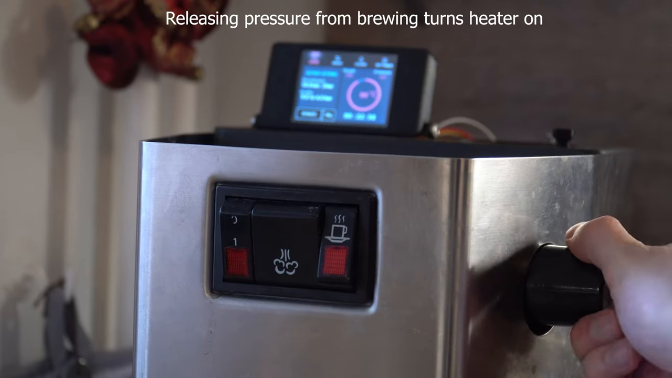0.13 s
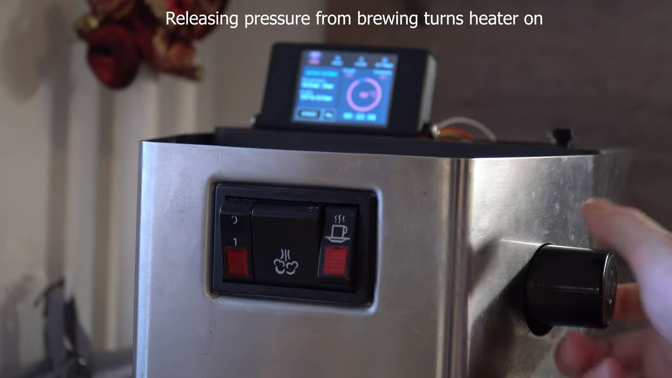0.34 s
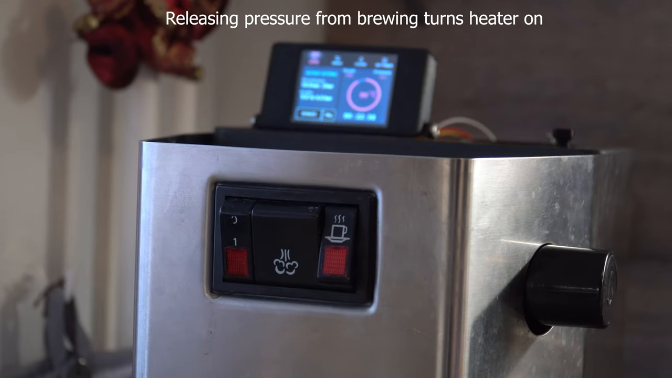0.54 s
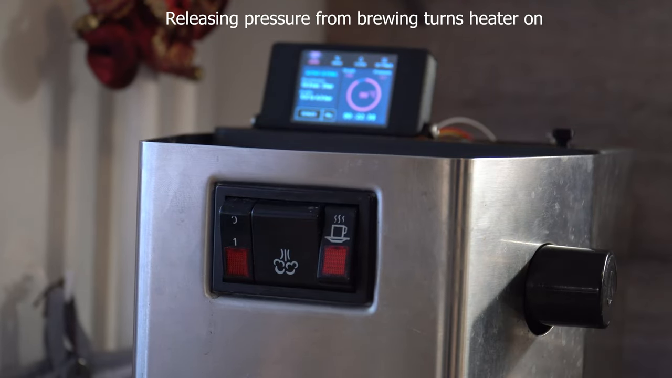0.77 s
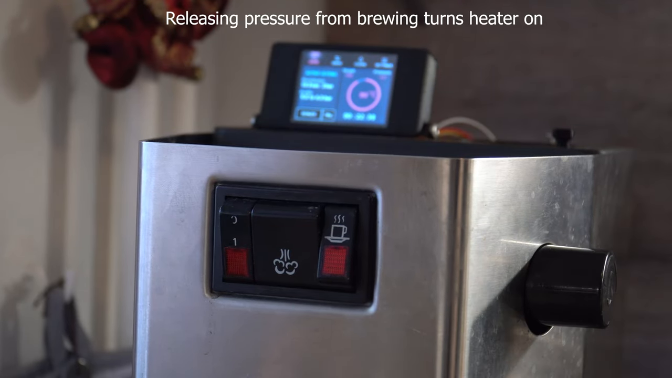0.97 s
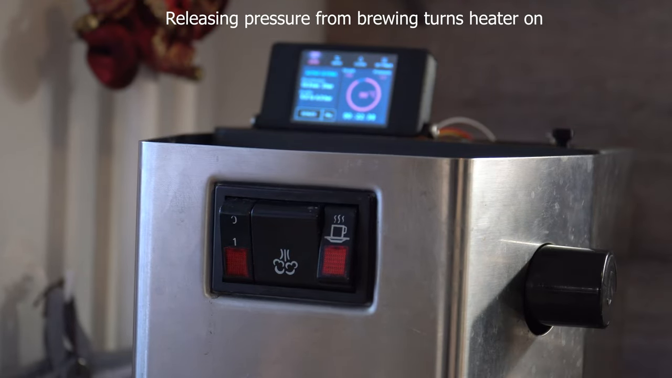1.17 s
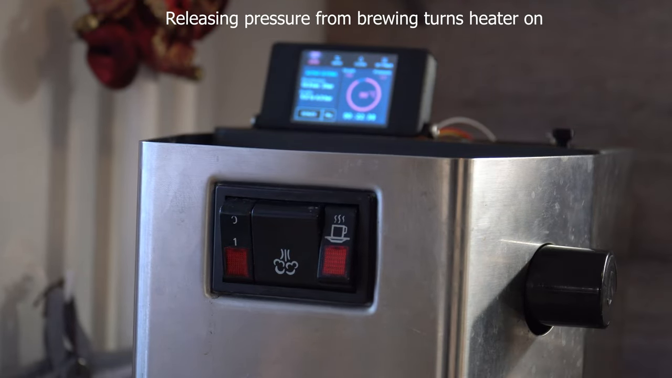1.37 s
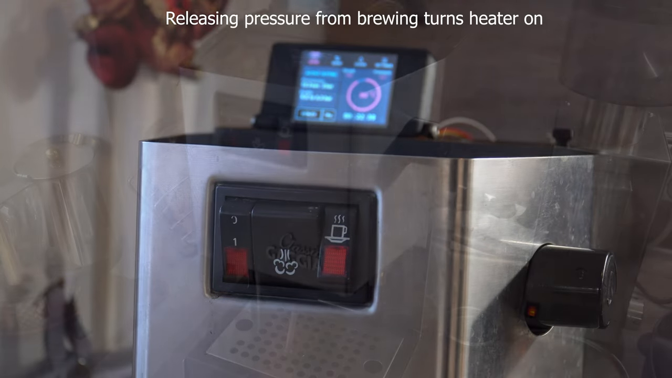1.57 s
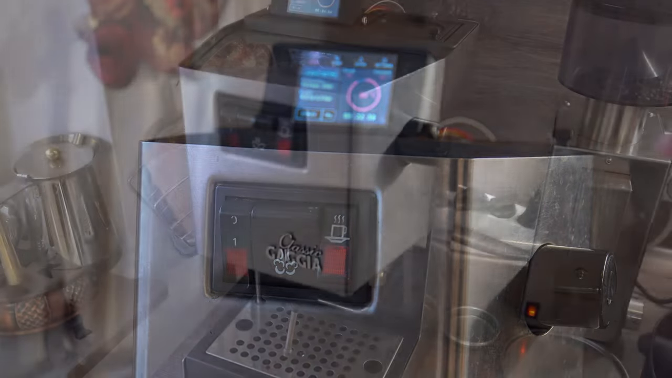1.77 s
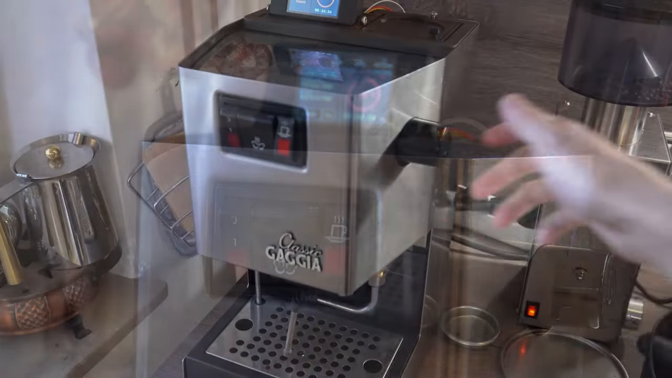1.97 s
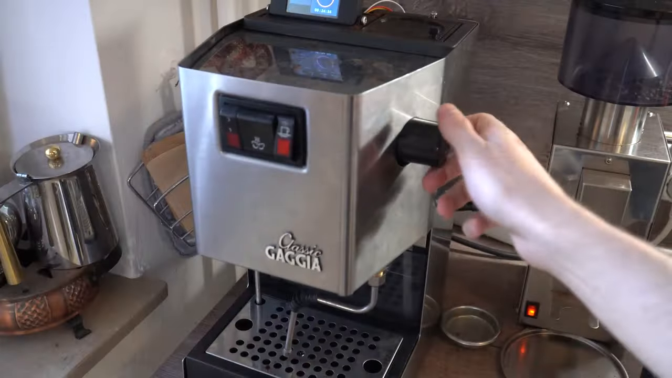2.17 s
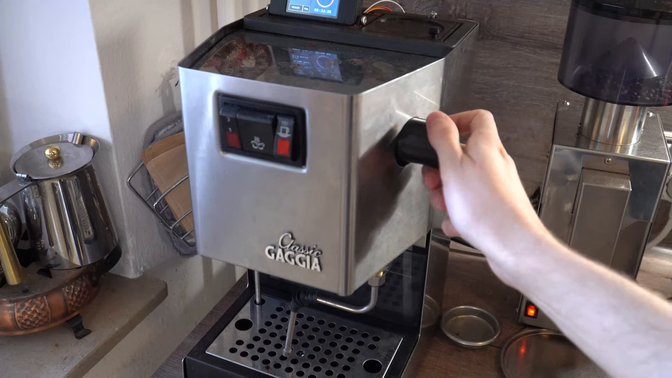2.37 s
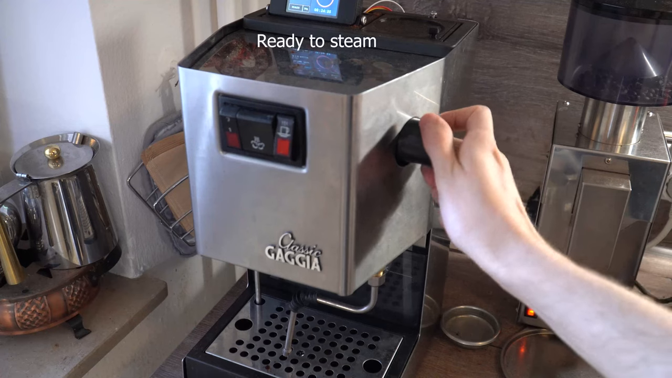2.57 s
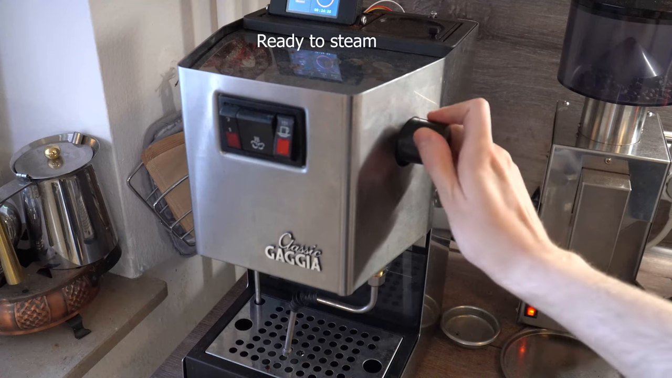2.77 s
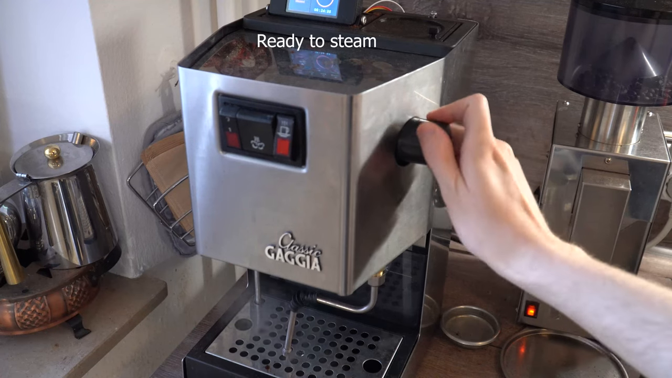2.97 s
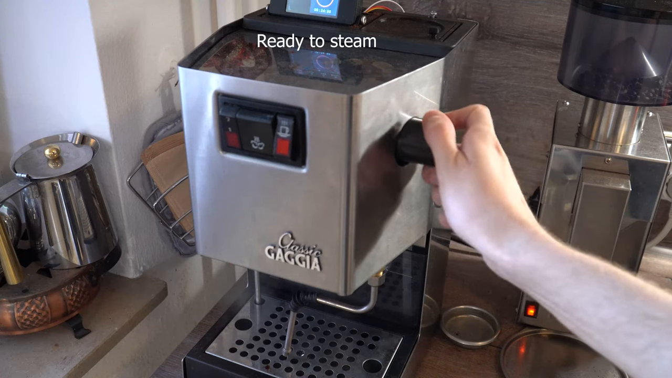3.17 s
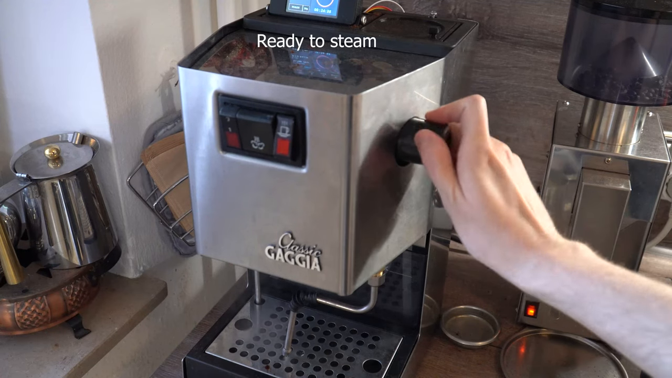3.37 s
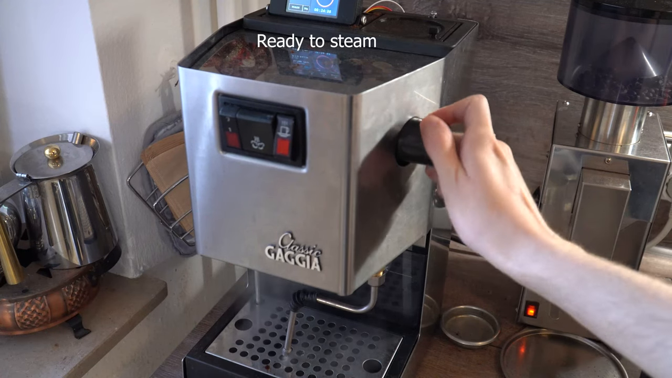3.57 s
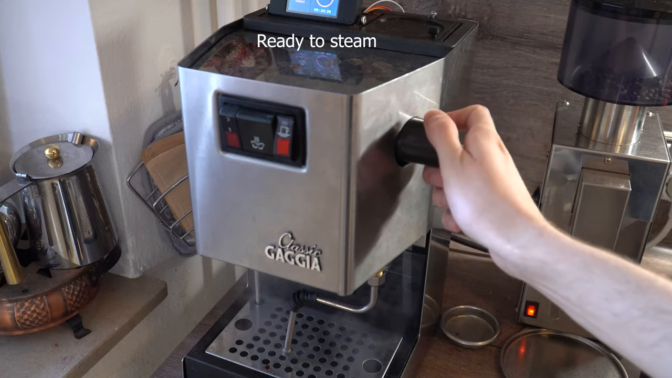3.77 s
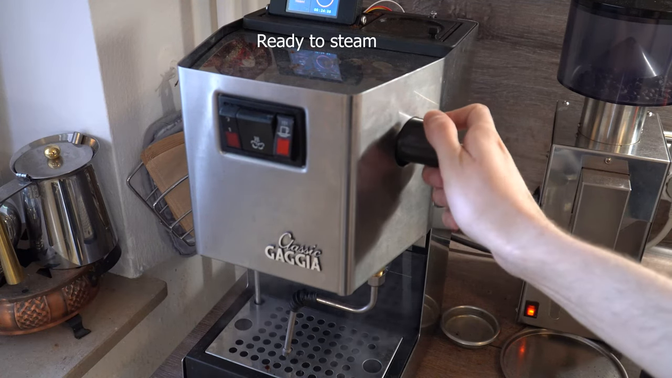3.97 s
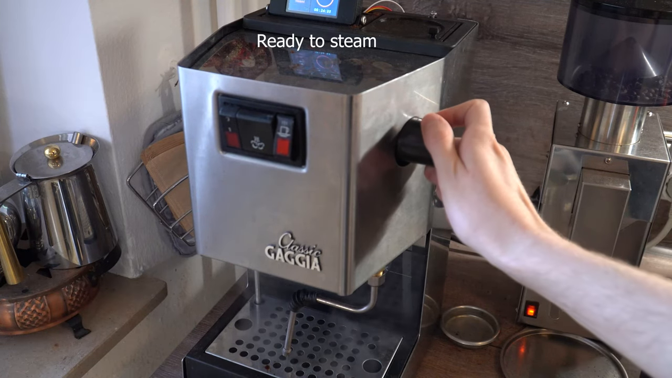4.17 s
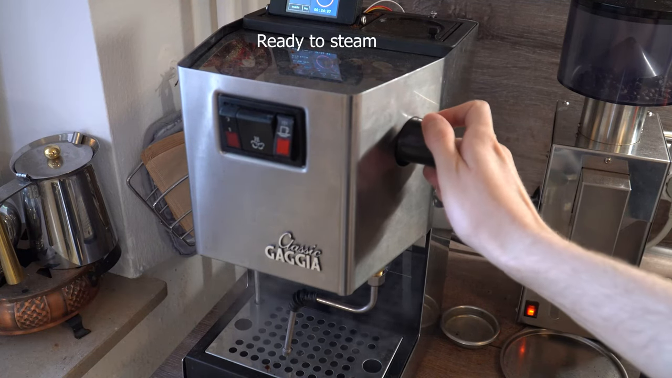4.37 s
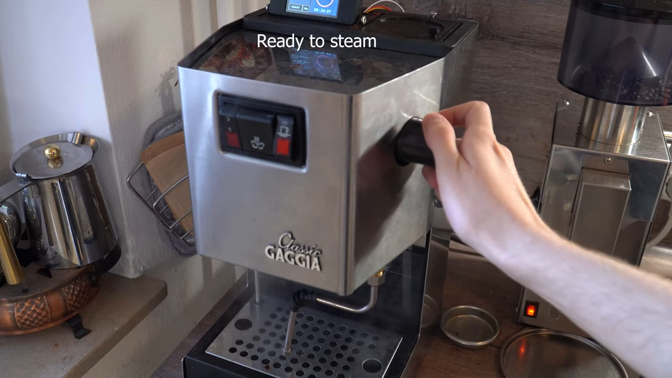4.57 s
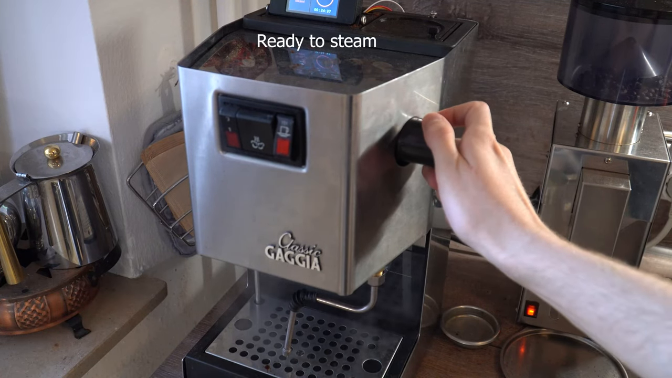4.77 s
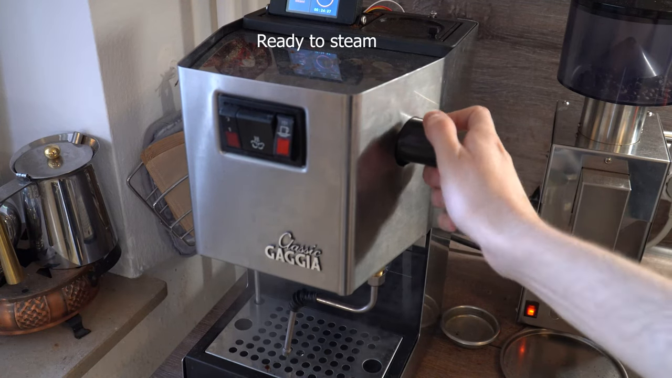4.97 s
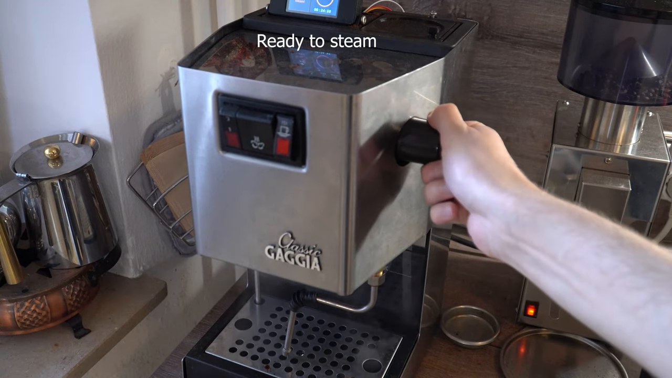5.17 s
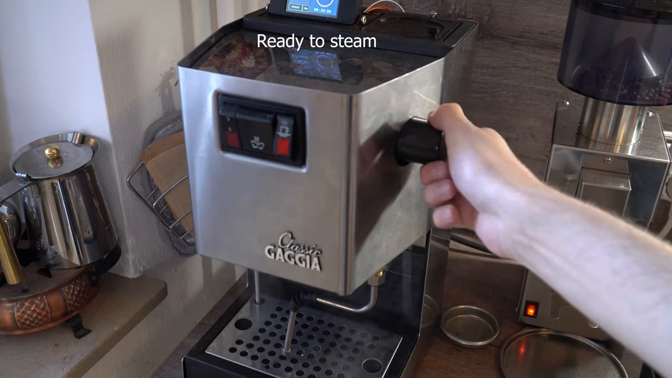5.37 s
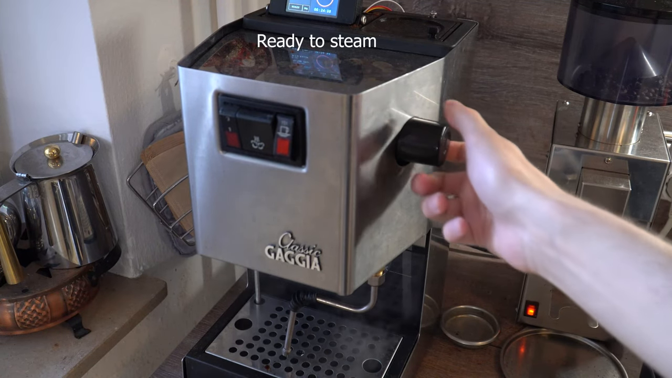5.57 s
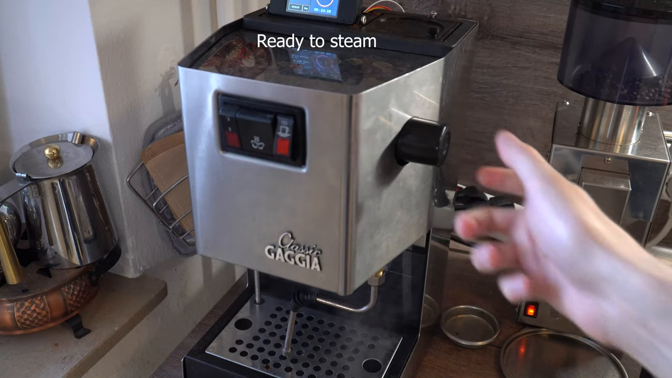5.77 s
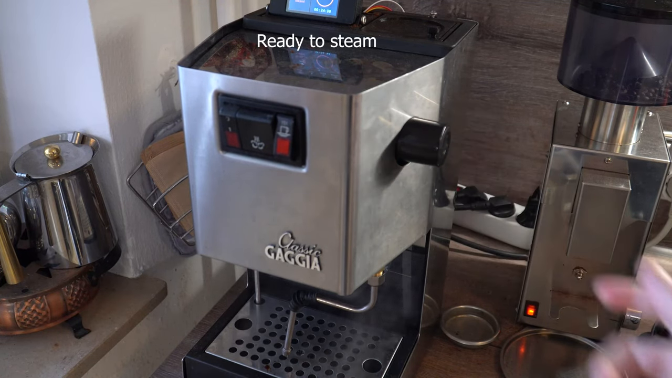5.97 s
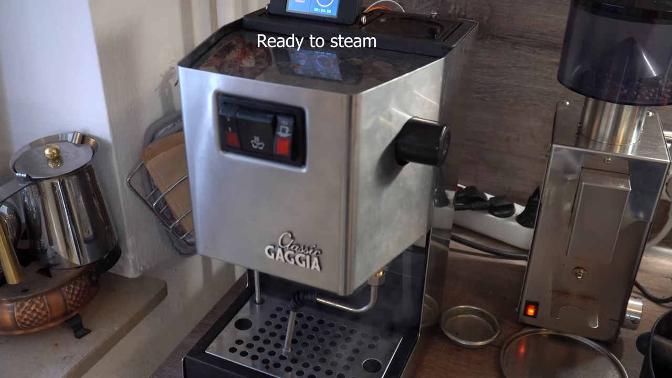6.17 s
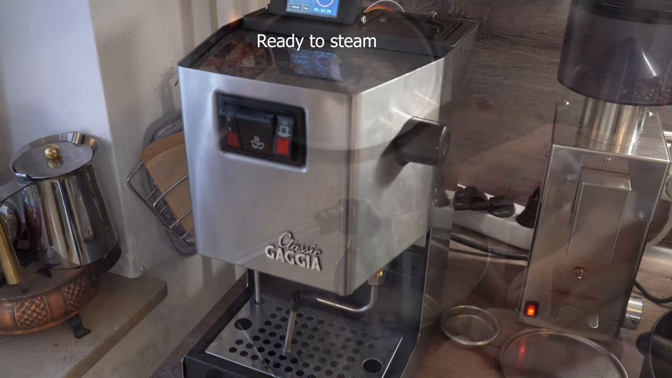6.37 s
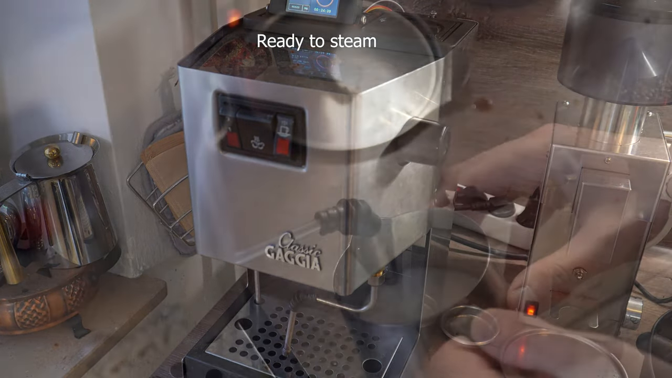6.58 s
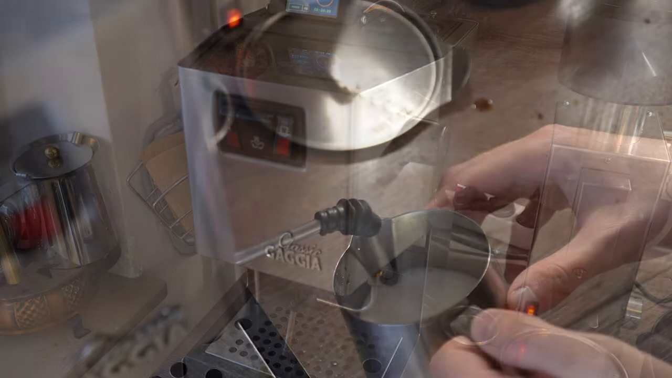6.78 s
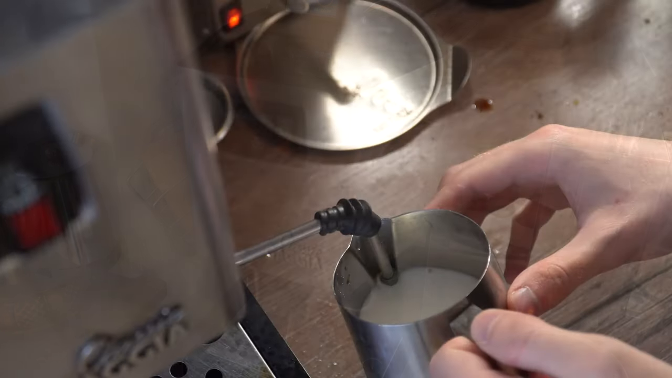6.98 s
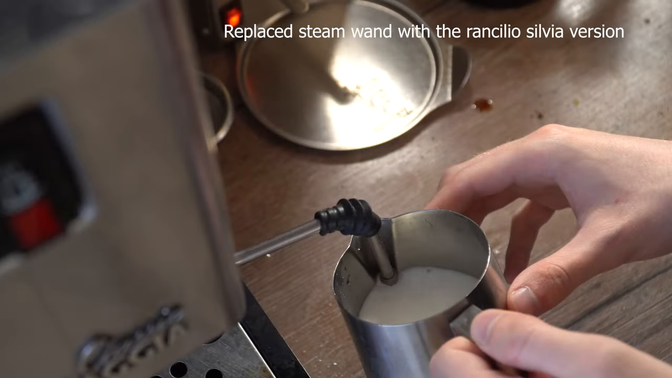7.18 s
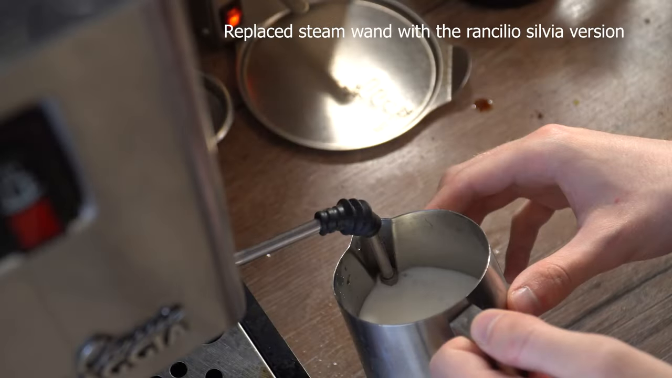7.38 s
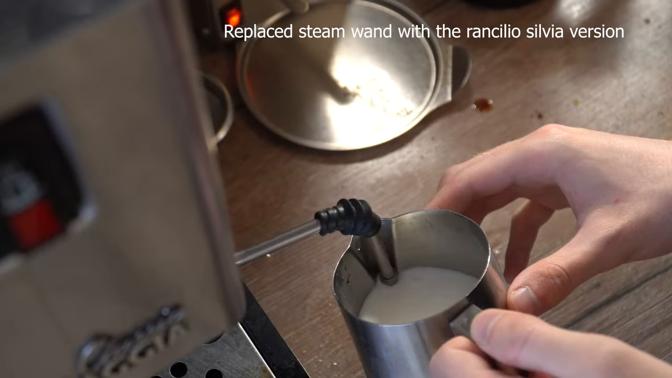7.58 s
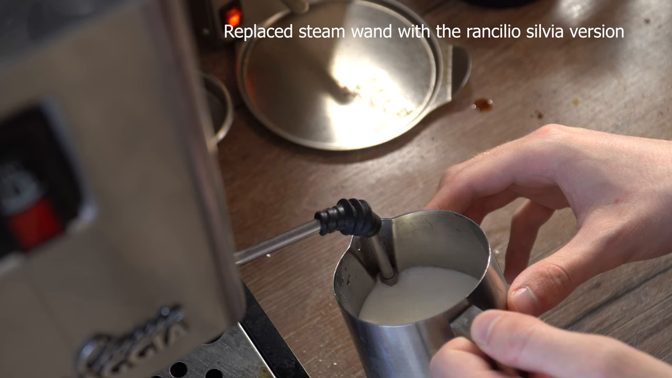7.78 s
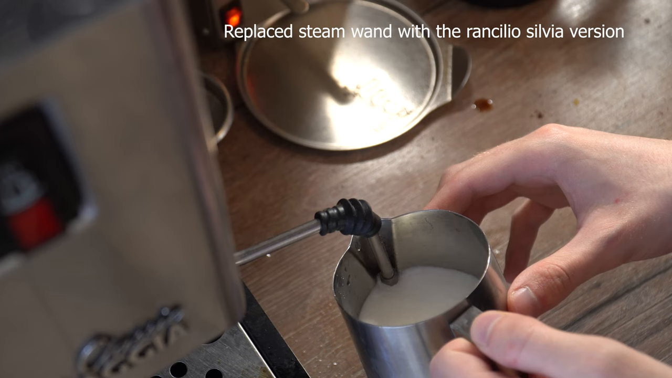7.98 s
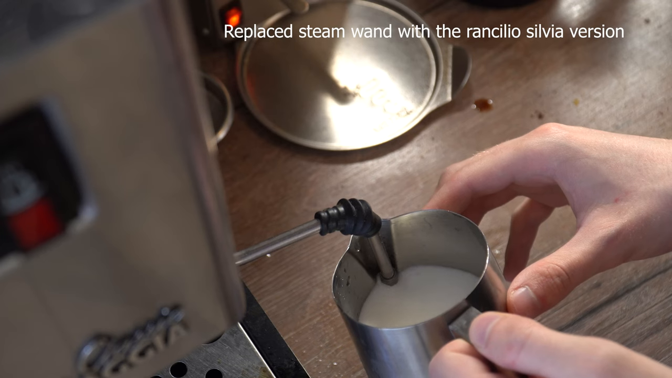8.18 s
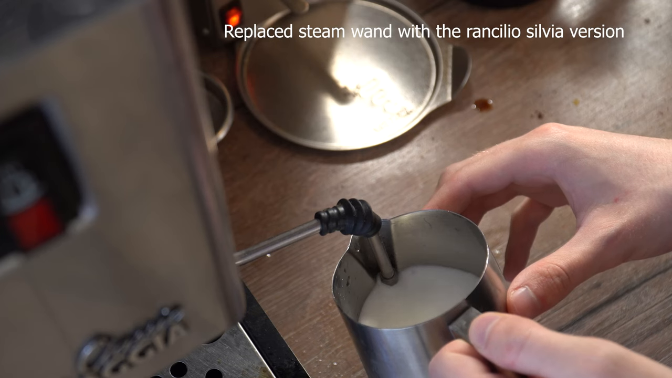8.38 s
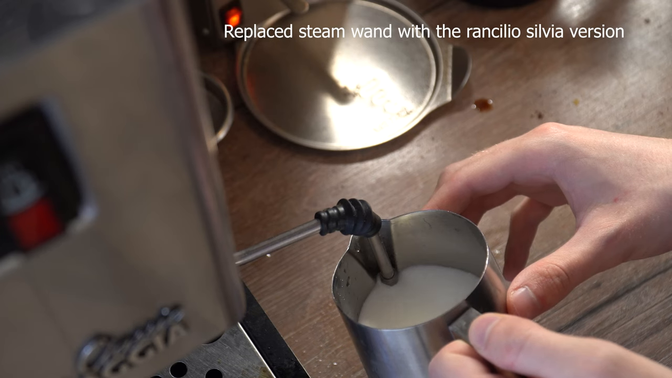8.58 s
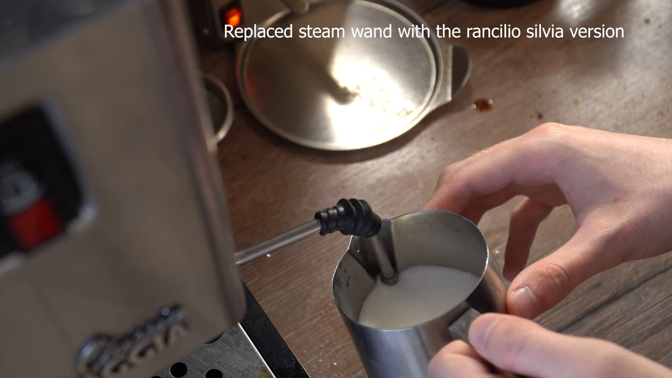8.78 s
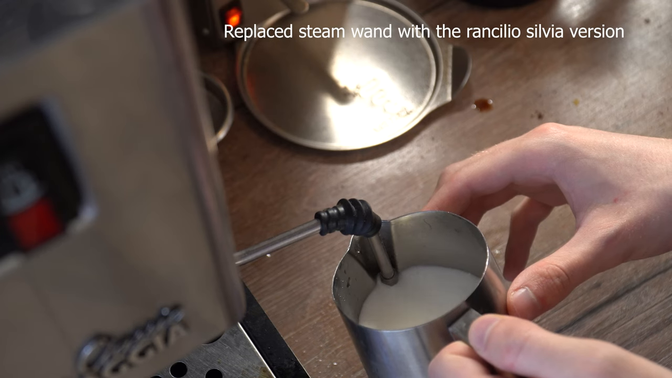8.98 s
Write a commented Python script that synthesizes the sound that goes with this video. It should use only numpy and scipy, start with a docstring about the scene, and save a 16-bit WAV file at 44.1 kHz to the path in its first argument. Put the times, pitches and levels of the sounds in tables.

```python
"""A kitchen with a home espresso machine: its housing clunks twice, then the heater hums and the boiler simmers.
The steam knob is opened: the wand spits water, sputters, whistles briefly and settles to a hiss.
Then the wand sits in a steel pitcher of milk: steam bubbles collapse and the tip sucks in gulps of air.
Turbulent jets are filtered noise, metal and drops are damped sines, bubbles are rounded bursts of tone,
and reflections from nearby panels and the room widen the wand, the pitcher and the housing."""
import sys
import numpy as np
from scipy import signal
from scipy.fft import rfft, irfft
from scipy.io import wavfile
from scipy.ndimage import uniform_filter1d

SR = 44100
rng = np.random.default_rng(int(sys.argv[2]) if len(sys.argv) > 2 else 0)


def materialize(psi):
    """Save the field psi as 16-bit PCM at rate SR to the path in sys.argv[1].

    A 1-D psi becomes a single channel; in a 2-D psi each row is a channel.
    """
    bounded = np.clip(np.atleast_2d(psi).T, -1, 1)
    quanta = np.round(bounded * 32767).astype(np.int16)
    wavfile.write(sys.argv[1], SR, quanta)


N = 397782
T = np.arange(N) / SR   # time in seconds

# resonances of steel pitcher and milk: centre_hz, width_hz, lift_db
PITCHER_PEAKS = [(509, 66, 10), (751, 89, 13), (1006, 188, 20), (1131, 122, 19.5), (1432, 145, 13),
                 (2103, 77, 14.5), (2450, 130, 8), (2980, 720, 19), (3480, 110, 12), (3955, 570, 10),
                 (4853, 130, 12.5), (5270, 740, 9.5), (6700, 990, 8), (8640, 860, 8.5), (10800, 990, 7)]
# steam takes hold in the milk: fizz and light sips start this far down and ease up
CHURN_START_S, FIZZ_START_S, FIZZ_RISE_DB = 6.19, 6.165, 21


def from_db(db):
    """Logarithmic level: decibels to amplitude gain."""
    return 10 ** (np.asarray(db) / 20)


def rms_one(x):
    """Power normalization: scale to an rms of 1."""
    return x / np.sqrt(np.mean(x ** 2) + 1e-20)


def white():
    """White noise: equal expected power at all frequencies, fresh on each call."""
    return rng.standard_normal(N)


def level(rows, axis=1, fade_in=.01, fade_out=.02):
    """Level interpolation: gain along a dB column, with exponential fades (in seconds) outside the table."""
    rows = np.array(rows)
    before = np.maximum(rows[0, 0] - T, 0) / fade_in
    after = np.maximum(T - rows[-1, 0], 0) / fade_out
    gain = from_db(np.interp(T, rows[:, 0], rows[:, axis]))
    return gain * np.exp(-np.minimum(before + after, 20))


def drift(rate):
    """Low-passed noise: smooth chance with an rms of 1 that changes about `rate` times a second."""
    f = np.arange(N // 2 + 1) * SR / N
    return rms_one(irfft(rfft(white()) / (1 + (f / rate) ** 2), N))


def colour(x, spectrum, peaks=(), size=8192):
    """Source-filter principle: causal filter of unit power, a smooth slope with peaks on top."""
    f = np.maximum(np.arange(size // 2 + 1) * SR / size, 1)
    hz, db = np.transpose(spectrum)
    shape = np.interp(np.log(f), np.log(hz), db)
    for centre, width, lift in peaks:
        shape = shape + lift / (1 + (2 * (f - centre) / width) ** 2)
    # folding the cepstrum gives the minimum-phase response
    cepstrum = irfft(np.log(from_db(shape)))[:size // 2]
    response = irfft(np.exp(rfft(2 * cepstrum, size) - cepstrum[0]))
    return signal.oaconvolve(x, response / np.linalg.norm(response))[:N]


def decay(start, t60):
    """Exponential damping: a step at `start` that falls by 60 dB in t60 seconds."""
    age = T - start
    return (age >= 0) * np.exp(-np.clip(np.log(1000) * age / t60, 0, 20))


def grains(per_s, spread_db):
    """Random impulse train: clicks of uneven size and either sign; rms 1."""
    sizes = from_db(spread_db * np.minimum(rng.exponential(1, N), 4)) * np.sign(white())
    return rms_one(sizes * (rng.random(N) < per_s / SR))


def throb(per_s, jitter, t60, spread_db):
    """Relaxation cycle: envelope of a loosely regular train of puffs; rms 1."""
    cycles = np.floor(np.cumsum(per_s * np.exp(jitter * drift(per_s)) / SR))
    sizes = from_db(spread_db * np.clip(white(), -2, 2))
    kicks = (np.diff(cycles, prepend=0) > 0) * sizes
    # a double pole gives each puff a rounded rise and an exponential tail
    r = from_db(-60 / (t60 * SR))
    return rms_one(signal.lfilter([1], [1, -2 * r, r * r], kicks + 1e-18))


def arch(start, end, edge):
    """Half-sine envelope: opens at once to the share `edge`, swells to 1 and closes again."""
    part = (T - start) / max(end - start, .005)
    edge = np.clip(edge, 0, 1)
    return ((part > 0) & (part < 1)) * (edge + (1 - edge) * np.sin(np.pi * part))


def settle(start, rise_db, settle_s):
    """Exponential approach: gain that starts rise_db down and eases up to 1."""
    age = np.maximum(T - start, 0)
    return (age > 0) * from_db(-rise_db * np.exp(-age / settle_s))


def rings(rows):
    """Free vibration: damped sines, one per row of (s, dB, Hz, t60), each with a weaker octave."""
    out = np.zeros(N)
    for s, db, hz, t60 in rows:
        phase = 2 * np.pi * hz * (T - s)
        out += from_db(db) * decay(s, t60) * (np.sin(phase) + 0.2 * np.sin(2 * phase))
    return out


def bubbles(rows, pitch_hz, scatter):
    """Bubble resonance: each (s, dB, length s) swells and dies as one rounded burst of tone."""
    out = np.zeros(N)
    for (s, db, length), (detune, turn) in zip(rows, rng.standard_normal((len(rows), 2))):
        near = slice(int((s - 2 * length) * SR), int((s + 2 * length) * SR))
        age = T[near] - s
        hz = pitch_hz * np.exp(scatter * detune)
        tone = np.sin(2 * np.pi * (hz * age + turn))
        out[near] += from_db(db) * .5 ** ((2 * age / length) ** 2) * tone
    return out


def edge_tone(rows, waver, waver_rate):
    """Edge tone: unsteady whistles that swell and glide, each smeared into a band by a fast waver."""
    unsteady, out = 1 + waver * drift(waver_rate), 0
    for s, end, first_hz, last_hz, db in rows:
        pitch = np.interp(T, [s, end], [first_hz, last_hz]) * unsteady
        tone = np.sin(2 * np.pi * np.cumsum(pitch) / SR)
        out = out + from_db(db) * arch(s, end, edge=0.54) * tone
    return out * rms_one(from_db(1.6 * drift(200)))


def echoes(x, t60, gap=0.0018):
    """Diffuse reverberation: dense reflections of unit power after `gap` seconds that die in t60."""
    t = T[:SR // 2]
    response = rng.standard_normal(len(t)) * (t > gap) * np.exp(-np.log(1000) * t / t60)
    return signal.oaconvolve(x, response / np.linalg.norm(response))[:N]


def place(x, pan_db, side_db, room_db, room_t60=.33, lag=.27):
    """Spatial hearing: steel panels widen a source, each side gets a room tail, the right lags `lag` samples."""
    side = from_db(side_db) * echoes(x, t60=0.0084, gap=0)
    tail = np.array([echoes(x, room_t60), echoes(x, room_t60)])
    # a linear phase slope delays by part of a sample
    delay = np.exp(-2j * np.pi * lag * np.arange(N // 2 + 1) / N)
    late = irfft(rfft(x - side) * delay, N)
    return (np.array([x + side, late]) + from_db(room_db) * tail) * from_db([[pan_db / 2], [-pan_db / 2]])


def kitchen_floor():
    """Partial coherence: quiet room noise, part of it shared by both sides."""
    # spectrum of the quiet kitchen: freq_hz, density_db
    floor_colour = [(15, -50), (25, -3), (53, -11.5), (122, -1), (209, -8.5), (297, -6), (399, -10),
                    (445, -13), (495, -8), (567, -12.5), (666, -10), (1020, -15.5), (15500, -28)]
    shared = white()
    sides = [colour(shared + 1.8 * white(), floor_colour) for _ in range(2)]
    return from_db(-58) * 0.77 * np.array(sides)


def mains_hum(mains_hz=50):
    """Forced vibration: the heater hums as a sine at the mains frequency; stereo."""
    # heater hum before panning: time_s, rms_level_db
    heater_level = [(1.4, -70), (1.67, -61), (2.22, -52), (3.38, -56), (3.44, -61.5), (6.63, -52.5),
                    (7.22, -58), (8.95, -55.5)]
    hum = level(heater_level, fade_in=.1) * np.sqrt(2) * np.sin(2 * np.pi * mains_hz * T)
    return hum * from_db([[1.7], [-1.9]])


def boiler_simmer(evenness=0.77, attack_s=0.025, t60_s=0.51, surge_db=1, surges_per_s=8):
    """Resonant boiling noise: simmering water rumbles in surging bouts in one low resonance; stereo."""
    # spectrum of the rumble: freq_hz, density_db
    rumble_colour = [(50, -39), (80, -41), (100, -7), (117, -11.5), (131, 9), (146, -6), (175, -27.5),
                     (240, -39), (2000, -85)]
    # bouts of simmering, before surges and panning: start_s, end_s, level_db
    bout_rows = [(1.348, 1.41, -51), (1.56, 1.62, -51), (1.62, 1.703, -42), (2.07, 2.315, -40.5),
                 (2.521, 2.637, -32.5), (2.72, 3.002, -34), (3.03, 3.155, -46.5), (3.46, 3.64, -54),
                 (3.934, 4.15, -49), (4.146, 4.41, -41), (4.42, 4.658, -36.5), (4.71, 5.097, -40),
                 (5.255, 5.475, -41.5), (5.46, 5.528, -36)]
    rumble = colour(white(), rumble_colour)
    # dividing by its own running level makes the rumble steadier
    swell = np.sqrt(uniform_filter1d(rumble ** 2, size=1700) + 1e-9)
    steady = rms_one(rumble / swell ** evenness)
    spread = from_db(-12.0) * colour(white(), rumble_colour) * [[1], [-1]]
    bouts = np.max([from_db(db) * np.clip((T - s) / attack_s, 0, 1) * ((T < end) + decay(end, t60_s))
                    for s, end, db in bout_rows], axis=0)
    simmer = from_db(surge_db * drift(surges_per_s)) * bouts * (steady + spread)
    return simmer * from_db([[-1.4], [1.2]])


def valve_trickle():
    """Turbulent leakage: the last pressure trickles out of the valve as noise and sparse clicks."""
    # gain of the trickle: time_s, gain_db
    trickle_level = [(0, -52), (.04, -55), (.08, -56.5), (.15, -53), (.185, -78)]
    # spectrum of the trickle: freq_hz, density_db
    trickle_colour = [(120, -30), (200, 0), (267, -7), (298, -6), (530, -7), (721, -20), (912, -5),
                      (1150, -34), (1260, -8), (1690, -14.5), (3350, -10.5), (3940, -20), (15000, -27)]
    source = white() + .7 * grains(per_s=300, spread_db=4)
    return level(trickle_level) * colour(source, trickle_colour, [(3350, 300, 10)])


def knob_knocks():
    """Impact response: knob and fingers knock on the housing, which rings briefly."""
    # knocks: start_s, level_db, pitch_hz, t60_s
    knocks = [(.158, -40, 452, 0.037), (.159, -42.5, 528, 0.13), (.42, -49.5, 498, 0.24),
              (.425, -53, 760, 0.065)]
    return rings(knocks)


def clunks(ring_db=-11):
    """Modal excitation: a short rattling contact sets the steel housing ringing in its modes."""
    # clunks inside the housing: start_s, ring_db (before the overall ring_db), contact_db
    hits = [(0.157, -50, -52), (.483, -64, -49), (0.4908, -30, -25.5), (0.503, -23.5, -36),
            (1.165, -50, -37), (1.171, -30, -28), (1.182, -23.5, -39), (5.727, -59, -53)]
    # housing modes: freq_hz, relative_level_db, t60_s
    housing_modes = [(88, -18, 0.78), (237, -11.5, 0.73), (320, -5.5, 0.41), (445, 2.5, 0.11),
                     (538, -8, 0.25), (737, 3, 0.12), (815, -13, .12), (1124, -15, .12), (1396, 8, 0.046),
                     (1803, -5, 0.098), (1880, 1, 0.12), (1900, -2, 0.092), (3130, -15, 0.16),
                     (3450, -17, 0.16)]
    # spectrum of the contact noise: freq_hz, density_db
    contact_colour = [(80, -7), (300, 8.5), (800, 7.5), (1100, -8), (1900, 5.5), (2700, -8), (6000, -8),
                      (8000, -7.5), (9700, -4), (12000, -10), (15500, -15)]
    bursts = sum(from_db(db) * decay(s, t60=0.1) for s, _, db in hits)
    contact = colour(bursts * white(), contact_colour)
    out, t = np.zeros(N), T[:SR // 2]
    hz, mode_db, t60 = np.transpose(housing_modes)[:, :, None]
    modes = from_db(mode_db) * np.exp(-np.log(1000) * t / t60) * np.sin(2 * np.pi * hz * t)
    for s, db, _ in hits:
        start = int(s * SR)
        signs = rng.choice([-1, 1], len(modes))   # each hit starts the modes with its own polarities
        out[start:start + len(t)] += from_db(db + ring_db) * (signs @ modes)
    return out + contact


def blurts():
    """Two-phase flow: plugs of water in the wand give dull, decaying puffs of noise."""
    # low blurts of water: start_s, level_db
    blurt_rows = [(2.902, -35.5), (3.47, -42), (3.639, -35.5), (6.749, -35.5)]
    puffs = sum(from_db(db) * decay(s, t60=0.27) for s, db in blurt_rows)
    return colour(puffs * white(), [(90, -11), (200, -9.5), (350, -3.5), (800, -4.5), (1500, -5), (3000, -38)])


def nozzle_pops():
    """Damped resonance: drops leave the nozzle with a short ring; the first one also spits noise."""
    # drops that pop at the nozzle: start_s, level_db, pitch_hz, t60_s
    pops = [(2.786, -16.5, 3510, 0.053), (2.812, -17, 2870, 0.066), (3.316, -20.5, 4280, 0.029),
            (4.022, -38, 426, .085), (4.215, -35.5, 730, 0.096), (5.054, -15.5, 5620, .038),
            (5.475, -45, 1426, 0.098), (5.727, -41, 1170, .059), (5.82, -49, 1197, 0.24)]
    spit = colour(white(), [(1500, -18), (2700, -5.5), (3700, 11), (4700, -24), (6500, -3.5), (9500, -1),
                            (12000, -11), (15500, -19)])
    return rings(pops) + from_db(-9) * decay(pops[0][0], t60=0.044) * spit


def nozzle_whistle():
    """Edge tone of a fast jet: the nozzle whistles briefly at full flow."""
    # whistles, before the waver: start_s, end_s, first_pitch_hz, last_pitch_hz, level_db
    whistles = [(3.475, 3.497, 12600, 14000, -14), (3.545, 3.575, 14000, 14400, -13.5),
                (3.592, 3.618, 13200, 14200, -13), (3.647, 3.725, 12400, 10900, -7.5),
                (3.73, 3.79, 10800, 9600, -20)]
    return edge_tone(whistles, waver=.06, waver_rate=900)


def steam_jet(hiss_db=-1, spray_db=-15.3, spray_follows=.96, drying_db_per_s=1, slug_db=-11,
              slug_gap_s=.0249, split_hz=4700, sputter=0.2):
    """Turbulent jet noise: dry steam hisses on top, condensed water sputters below and slowly dries."""
    # flow of steam as the knob is turned, before hiss_db and spray_db: time_s, level_db
    flow_rows = [(2.81, -12.5), (2.85, -20.5), (2.97, -16), (3.07, -13.5), (3.15, -24.5), (3.3, -27.5),
                 (3.41, -14.5), (3.61, -15.5), (3.63, -19), (3.66, -13.5), (3.96, -26), (4.4, -21.5),
                 (4.45, -15), (4.47, -21), (5.02, -21), (5.15, -26.5), (5.8, -32.5), (6.33, -33)]
    # spectrum of the jet: freq_hz, density_db
    jet_colour = [(250, -30), (500, -25), (1000, -26.5), (2000, -30.5), (4200, -14.5), (7800, 1),
                  (10000, 4.5), (15500, 3.5)]
    # fixed peaks in the colour of the hiss, from nearby reflections: centre_hz, width_hz, lift_db
    jet_peaks = [(809, 154, 11.2), (1234, 340, 12), (1500, 47, 4.8), (2114, 860, 14.5), (2913, 590, 12.4),
                 (3555, 135, 8.1), (5090, 250, 7.8), (5640, 180, 5.7), (6007, 150, 9.6), (6470, 61, 5.4),
                 (7205, 200, 7.6), (9150, 830, 7.5), (10370, 71, 7.8), (10660, 490, 5.9),
                 (11260, 130, 13.4), (12100, 77, 2.7), (11960, 450, 9.8), (12950, 370, 10.6),
                 (14400, 210, 15.5), (15050, 440, 12.2)]
    # runs of evenly spaced water slugs, before slug_db: start_s, length_s, level_db
    slugs = [(2.81, .01, 1), (3.341, .01, -3), (3.459, .03, -4), (3.637, .01, 2), (3.805, .06, -3),
             (3.919, .14, -10.5), (4.182, .19, -8), (4.419, .04, -6.5)]
    puffs = throb(per_s=39, jitter=.25, t60=.018, spread_db=3)
    jet = colour(white(), jet_colour, jet_peaks)
    high, low = (rms_one(signal.sosfilt(signal.butter(4, split_hz, kind, fs=SR, output="sos"), jet))
                 for kind in ("high", "low"))
    flow = level(flow_rows, fade_in=0.0041, fade_out=0.6)
    hiss = from_db(hiss_db) * flow * high * rms_one(1 + 0.18 * puffs)
    wetness = from_db(spray_db - drying_db_per_s * (T - flow_rows[0][0]))
    spray = wetness * flow ** spray_follows * low * rms_one(1 + sputter * puffs)
    shots = sum(from_db(db + slug_db) * decay(s, t60=0.035)
                for start, length, db in slugs for s in start + np.arange(0, length, slug_gap_s))
    splash = colour(white(), [(150, -2), (900, -8.5), (2300, -2.0), (6000, 14.5), (11000, 13.0), (15500, 3)],
                    jet_peaks)
    return hiss + spray + uniform_filter1d(shots, size=130) * splash   # softened onsets


def entry_hoot():
    """Gliding edge tone: a faint falling hoot as steam first enters the milk."""
    # hoot, before the waver: start_s, end_s, first_pitch_hz, last_pitch_hz, level_db
    hoots = [(6.05, 6.35, 857, 684, -49.5)]
    return edge_tone(hoots, waver=.035, waver_rate=120)


def milk_churn(churn_db=-29.5, rise_db=17, settle_s=0.37, heave_db=1.3, count=200):
    """Bubble collapse: a loose train of steam bubbles plus noise rings the pitcher."""
    # spectrum of the churn: freq_hz, density_db
    churn_colour = [(60, -45), (120, -29), (146, 4), (178, -39.5), (600, -22), (900, -21.5), (1700, 0.5),
                    (2400, -27), (4000, -77)]
    gap, size = rng.standard_normal((2, count))
    times = CHURN_START_S + np.cumsum(np.exp(.3 * gap) / 62)   # about sixty bubbles a second
    bursts = bubbles([(s, db, .0045) for s, db in zip(times, 2 * size)], pitch_hz=1247, scatter=0.12)
    train = colour(bursts, churn_colour, PITCHER_PEAKS)
    train = train / np.std(train[T > CHURN_START_S])
    roar = .62 * train + .74 * colour(white(), churn_colour, PITCHER_PEAKS)
    return from_db(churn_db + heave_db * drift(12)) * settle(CHURN_START_S, rise_db, settle_s) * roar


def big_collapses(collapse_db=-1):
    """Cavity collapse: the biggest steam bubbles give separate bursts of tone."""
    # biggest bubbles, before collapse_db: peak_time_s, peak_db, length_s
    collapses = [(6.48, -22.5, 0.041), (6.729, -16, 0.014), (6.797, -18, .01), (6.813, -15.5, 0.01),
                 (7.016, -19, 0.012), (7.271, -12.5, 0.027), (7.41, -20, 0.0057), (7.624, -17.5, 0.0062),
                 (7.70, -22.5, 0.024), (8.08, -23, .02), (8.225, -18.5, 0.017), (8.586, -13, 0.0019),
                 (8.639, -25, 0.003), (8.727, -15, 0.016)]
    return from_db(collapse_db) * bubbles(collapses, pitch_hz=1139, scatter=0.064)


def milk_fizz(fizz_db=-32.5, settle_s=0.24):
    """Superposed small bursts: fine foam fizzes as noise and dense clicks."""
    # spectrum of the fizz: freq_hz, density_db
    fizz_colour = [(1500, -19.5), (2400, -25), (3200, -11.5), (5000, -12), (7500, -10.5), (11000, -9.5),
                   (15500, -24)]
    foam = rms_one(white() + 0.55 * grains(per_s=2500, spread_db=-1.5)) * from_db(1.7 * drift(15))
    fizz = from_db(fizz_db) * settle(FIZZ_START_S, FIZZ_RISE_DB, settle_s) * foam
    return colour(fizz, fizz_colour, PITCHER_PEAKS)


def air_gulps(sip_db=-30, sips_per_s=9, settle_s=0.32):
    """Air entrainment: the tip gulps air with a torn, crackling noise, with light sips throughout."""
    # the tip breaks the surface and gulps air: start_s, end_s, level_db
    gulps = [(6.41, 6.544, -24.5), (6.701, 6.794, -15.5), (6.787, 6.878, -16), (6.976, 7.12, -19),
             (7.12, 7.187, -22), (7.215, 7.357, -23), (7.345, 7.587, -24), (7.65, 7.745, -24.5),
             (7.79, 7.807, -22.5), (7.871, 7.948, -23), (8.056, 8.11, -21), (8.19, 8.241, -18.5),
             (8.333, 8.386, -24.5), (8.702, 8.74, -15), (8.737, 8.82, -26)]
    # spectrum of the air noise: freq_hz, density_db
    air_colour = [(200, -33), (1000, -17), (2500, -56), (4000, -23), (6000, -13.5), (8000, -7.5),
                  (11000, 0), (12000, 1.5), (13700, 7), (15500, 1.5)]
    sloshing = throb(per_s=sips_per_s, jitter=0.18, t60=.16, spread_db=2.0)
    sips = from_db(sip_db) * settle(FIZZ_START_S, FIZZ_RISE_DB, settle_s) * sloshing
    suction = np.hypot(sips, sum(from_db(db) * arch(s, end, edge=0.33) for s, end, db in gulps))
    tearing = rms_one(1 + .7 * throb(per_s=42, jitter=.5, t60=.025, spread_db=3.5))
    crackle = rms_one(white() + .5 * grains(per_s=2200, spread_db=-4.5))
    return colour(suction * tearing * crackle, air_colour, PITCHER_PEAKS)


def scene():
    """Superposition: machine, wand and pitcher add over the quiet of the kitchen."""
    body = place(clunks() + knob_knocks() + valve_trickle(), pan_db=0.7, side_db=-10.0, room_db=-4.0)
    wand = place(steam_jet() + nozzle_pops() + blurts() + nozzle_whistle(),
                 pan_db=2.0, side_db=-22, room_db=-6, room_t60=.17)
    milk = milk_churn() + big_collapses() + milk_fizz() + air_gulps()
    pitcher = place(milk + entry_hoot(), pan_db=1.8, side_db=-24, room_db=-11, room_t60=.13)
    return kitchen_floor() + mains_hum() + boiler_simmer() + body + wand + pitcher


def record(dry, top=0.88, cutoff_hz=15850):
    """Soft saturation and band limiting: the highest peaks are rounded and the treble is cut steeply."""
    rounded = dry / (1 + (dry / top) ** 4) ** (1 / 4)
    return signal.sosfilt(signal.ellip(12, .1, 80, cutoff_hz, fs=SR, output="sos"), rounded)


dry = scene()
out = record(dry)
materialize(out)
```